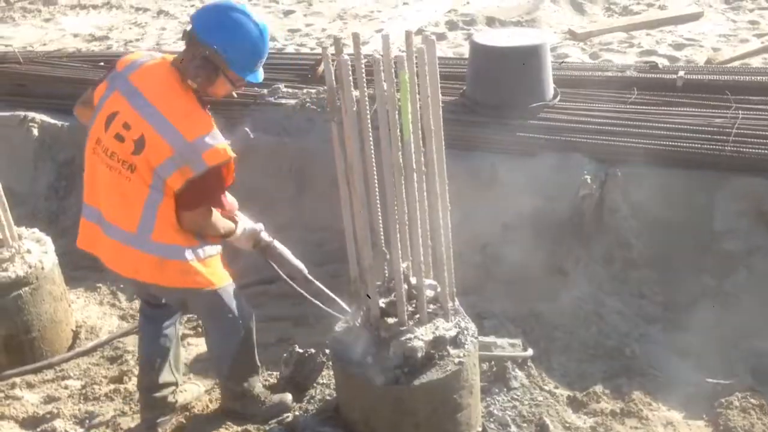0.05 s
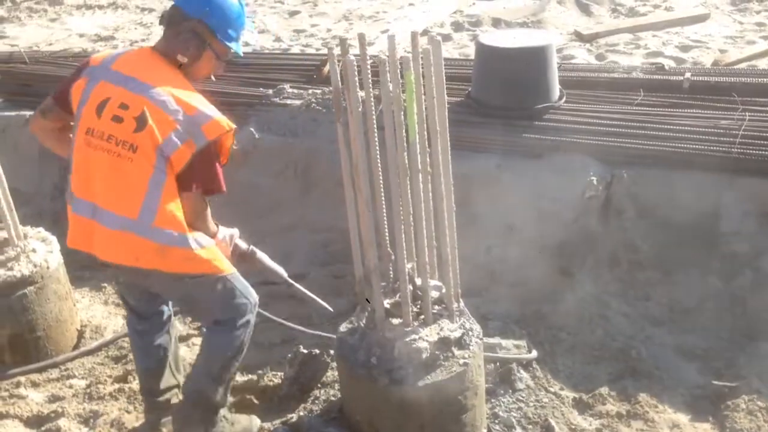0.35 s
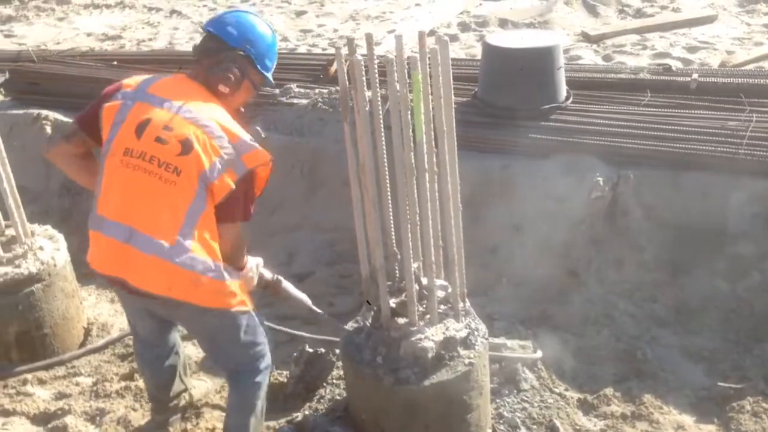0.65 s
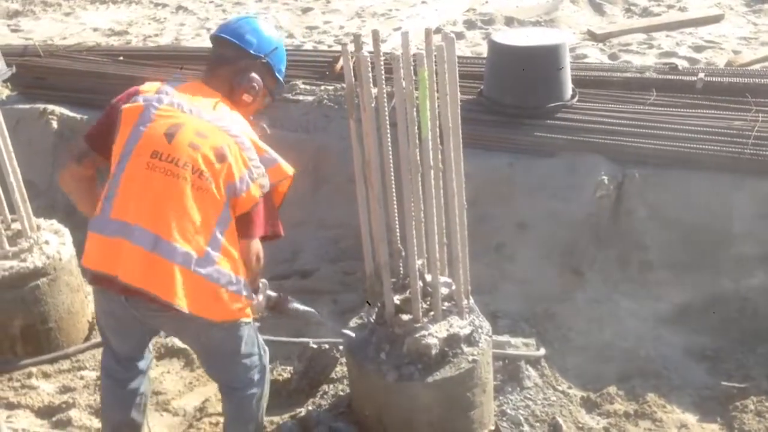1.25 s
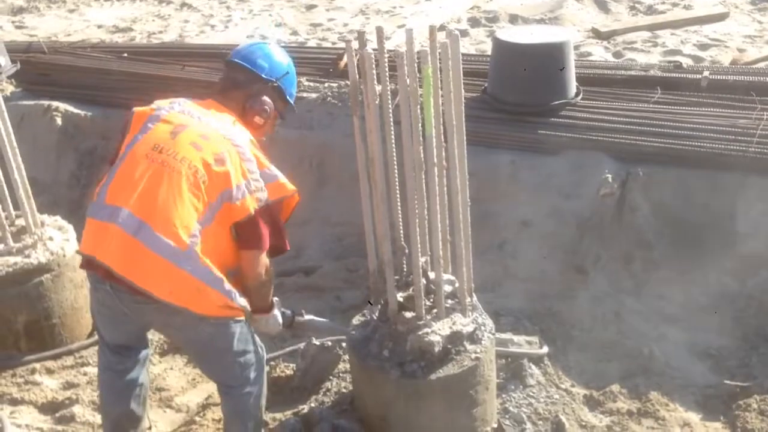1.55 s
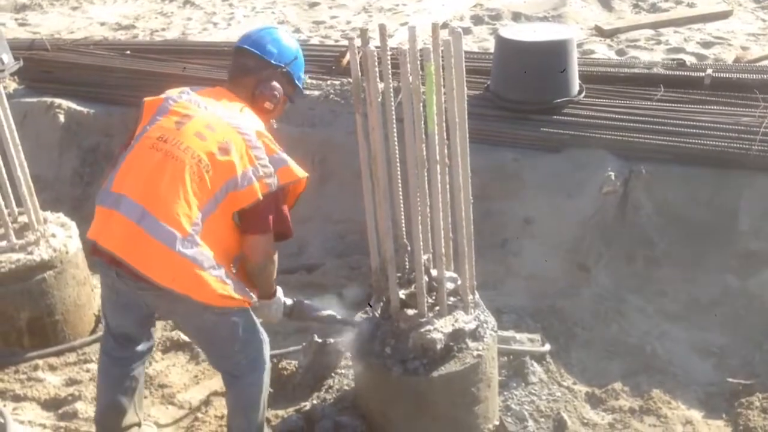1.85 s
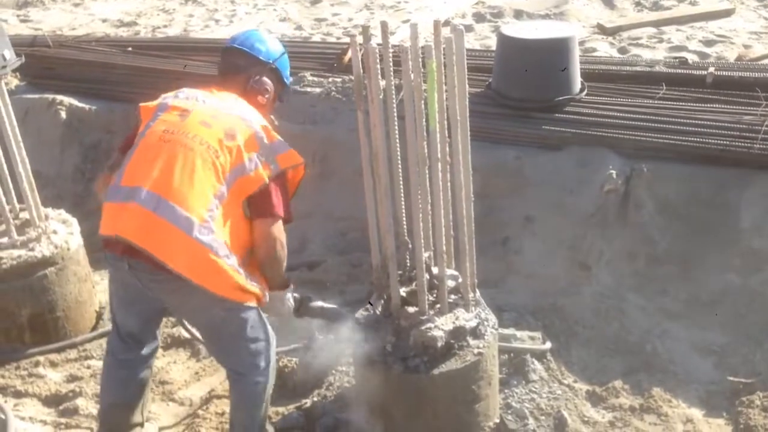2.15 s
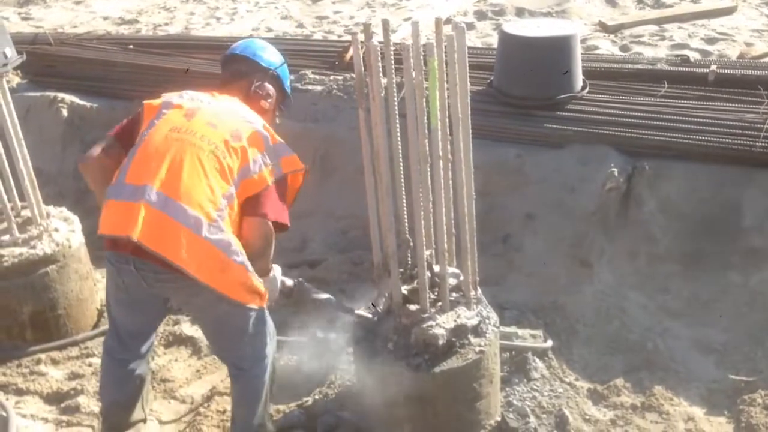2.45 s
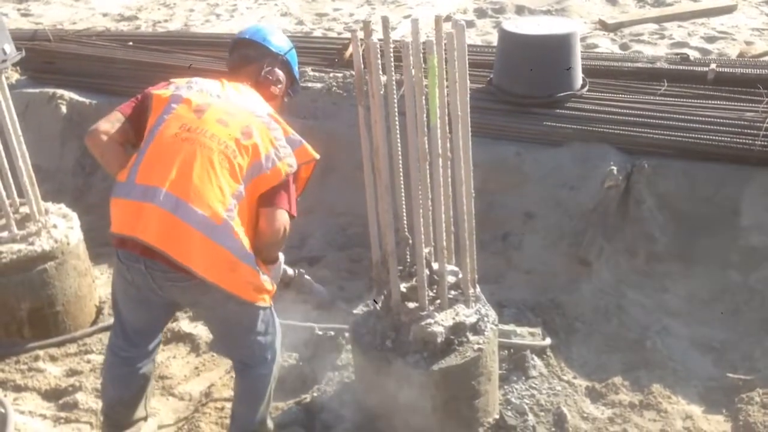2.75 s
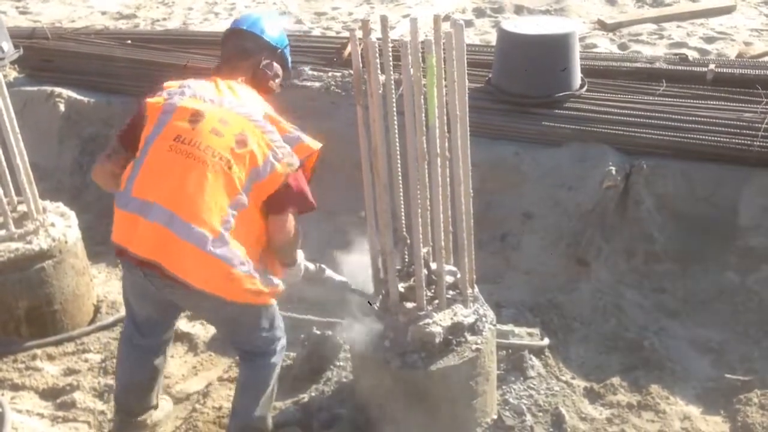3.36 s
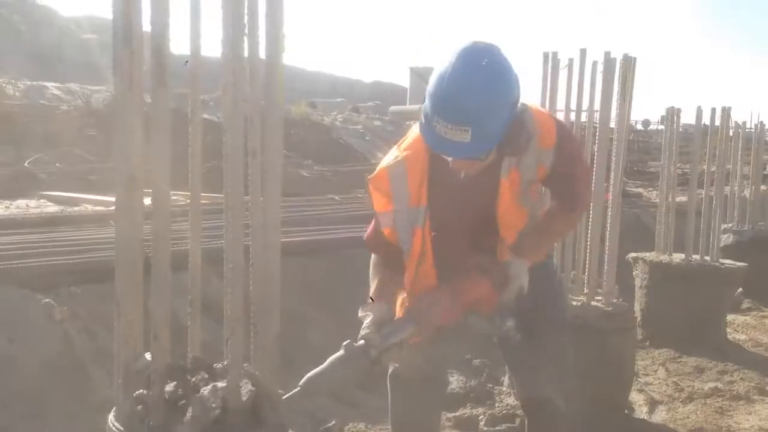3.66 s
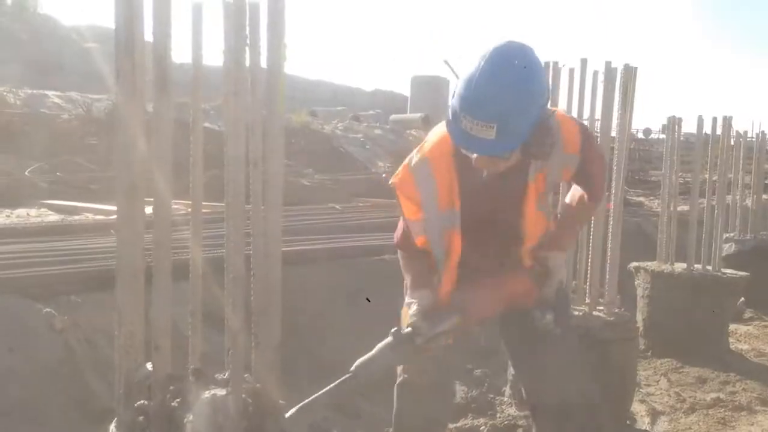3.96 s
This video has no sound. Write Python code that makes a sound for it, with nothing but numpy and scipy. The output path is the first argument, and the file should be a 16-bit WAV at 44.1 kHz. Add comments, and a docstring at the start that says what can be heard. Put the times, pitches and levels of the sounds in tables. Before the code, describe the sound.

A pneumatic hammer chips concrete close to the microphone in an earth pit. A few single blows lead to two rapid ringing bursts, with chisel clanks between, then a sharp air blast. Leaking air hisses and a distant compressor hums.

```python
"""Close to a pneumatic demolition hammer on a concrete pile, in an earth pit; air leaks, a far compressor hums.
One blow opens, two follow at 1 s: each thumps, cracks and rings the casing and the steel chisel.
Bursts of about 13 blows a second come at 1.8 s and 3.2 s, the return strokes puffing air; in the gaps
the tool clanks and knocks. At 3.8 s the chisel slips off and the piston fires empty, sending a gust to
the microphone. The recorder's gain control ducks on loud blows and creeps back."""
import sys
import numpy as np
from scipy import signal
from scipy.fft import rfft, irfft
from scipy.io import wavfile
from scipy.ndimage import uniform_filter1d

SR = 44100
rng = np.random.default_rng(int(sys.argv[2]) if len(sys.argv) > 2 else 0)


def to_wav(sig):
    """Store sig (one row per channel, or 1-D mono) as 16-bit WAV at the path in sys.argv[1].

    Samples outside -1..1 are clipped; the rate is SR.
    """
    pcm = np.clip(np.atleast_2d(sig), -1, 1) * 32767
    pcm = np.round(pcm).astype(np.int16)
    wavfile.write(sys.argv[1], SR, pcm.T)  # frames by channels


N = 176400
T = np.arange(N) / SR

# piston blows: start_s, level_db, hold_s, crack_t60_s, lower_ring_db, upper_ring_db, ring_t60_s
BLOWS = [(.0045, 3.5, 0.0028, 0.042, -7, -18, 0.086), (1.005, -10, 0.0079, 0.05, -35, -26, 0.025),
         (1.0406, 0.5, 0.0014, 0.044, 0, -19, 0.18), (1.8154, -10, 0.0037, 0.054, -26, -20, .044),
         (1.8531, 0, 0.0019, 0.055, -3, -3, 0.1), (1.926, -2.5, 0.0046, 0.074, -13, 5.5, .13),
         (2.003, 2, 0.0019, .075, 12, 2, 0.033), (2.086, 3.5, 0.0016, 0.055, 6.5, 3, .11),
         (2.1663, 3.5, 0.0026, 0.044, 3, 0.5, 0.083), (2.2423, 1, 0.0025, .049, 4, 0, 0.038),
         (2.3158, 2.5, 0.0037, .046, -1.5, -1.5, 0.063), (2.3934, 3.5, 0.0058, 0.033, -19, -10.5, 0.13),
         (2.4773, 2, 0.0069, 0.044, -13, -15, 0.088), (3.2283, 1.5, 0.002, 0.061, 2.5, 4, .11),
         (3.3065, -0.5, 0.0013, 0.057, -.5, -26, 0.18), (3.3877, -3.5, 0.0028, 0.077, -3, -7, 0.12),
         (3.4855, -3, 0.0028, 0.054, -2.5, -10, 0.075), (3.7526, -2, 0.0023, .04, -21, -30.5, 0.091)]
# return strokes of the piston: start_s, level_db
RETURN_STROKES = [(1.094, -16.5), (1.892, -18), (1.965, -11.5), (2.048, -12), (2.13, -13.5), (2.206, -16),
                  (2.279, -17), (2.355, -16), (2.439, -14.5), (3.152, -19.5), (3.191, -19), (3.273, -16),
                  (3.353, -17.5), (3.451, -18.5), (3.54, -19.5), (3.842, -9)]
# chisel clanking on concrete and bars, chips ticking: start_s, level_db, centre_hz, width_octaves, t60_s
CLANKS = [(0.9589, -9, 4650, 0.49, 0.035), (.962, -21.5, 2300, 0.49, 0.26), (.978, -25, 886, 0.077, 0.27),
          (1.124, -15, 4480, 1, 0.045), (1.149, -19.5, 5160, 0.87, .05), (1.1772, -8, 4830, 0.24, 0.065),
          (1.442, -19, 4300, 0.62, 0.04), (1.561, -11.5, 2030, 0.13, 0.043),
          (1.569, -12.5, 5230, 0.33, 0.064), (1.781, -25.5, 1560, 0.82, 0.4),
          (2.952, -33, 3000, 0.82, 0.028), (3.0044, -27.5, 3800, 0.46, 0.051),
          (3.1425, -18, 1940, 0.18, 0.093), (3.193, -17.5, 1230, 0.69, 0.11),
          (3.578, -26, 2000, 0.3, 0.089), (3.6062, -1.5, 4350, 0.1, 0.032), (3.688, -16, 7000, 1, 0.053),
          (3.706, -16.5, 3700, 0.34, 0.042), (3.7246, -7.5, 1980, 0.43, 0.14),
          (3.732, -11, 4100, 0.64, 0.064)]
# loose chisel rattling in its holder: start_s, bending_db, high_ring_db
RATTLES = [(0.077, -25, -54), (0.87, -33.5, -25), (1.048, -18.5, -24), (1.081, -42.5, -10),
           (1.131, -16.5, -9), (1.569, -23, -20), (1.89, -41, 1), (1.908, -38, -3), (1.962, -26, -12),
           (2.0225, -34, 0.5), (2.568, -25, -43), (3.42, -25, 0.5), (3.433, -28, -30), (3.582, -30.5, -47),
           (3.844, -29, 3.5)]
# dull boom under the blows at 0 s and 1.04 s, softer knocks of the tool elsewhere: start_s, level_db
KNOCKS = [(.002, -4), (.136, -22), (1.041, -9), (1.156, -17), (1.781, -25), (2.611, -22), (3.154, -18),
          (3.217, -20), (3.591, -20), (3.734, -21), (3.772, -21), (3.842, -18)]

# modes of the struck pile, recoiling tool, casing, bending chisel and whole tool fired empty:
# pitch_hz, level_db, t60_s
PILE_MODES = [(358, -1, .033), (405, 0, .033), (495, -4, .045)]
RECOIL_MODES = [(158, -1, .06), (205, 0, .05), (255, -2, .045)]
CASING_MODES = [(869, -0.5, 0.023), (2046, 1, 0.017), (2340, -52, 0.053), (2815, -7, 0.057),
                (3120, -15, 0.028), (4050, -13, 0.1), (4766, 5.5, 0.023), (5494, 4, 0.027),
                (6080, -6.5, 0.032), (6100, 6, 0.018), (10150, 0.5, 0.049), (13615, -5, .06),
                (14200, -2, .08)]
BENDING_MODES = [(1210, -11, .13), (3110, -5, .085), (5625, 2, .11), (5720, -6, .07), (8700, -2, .1)]
BLANK_MODES = [(842, -8, .06), (1502, -7, .06), (1548, -8, .06), (1975, -5, .06), (2363, -9, .06),
               (2705, -4, .07), (3133, 1, .06), (4160, -9, .1), (4756, -5, .09), (5633, -13, .18),
               (7184, -13, .2), (8272, -6, .17), (8515, -9, .17), (8860, -3, .13), (12085, -19, .17),
               (13614, -2, .1), (15582, -12, .17)]
# two clusters of high chisel modes: pitch_hz, level_db
CHISEL_LOWER_MODES = [(8272, -11), (8325, -17), (8530, -10)]
CHISEL_UPPER_MODES = [(8720, -16.5), (8875, -40.5), (9204, -4.5)]

# noise of cracking concrete, a blow's thump, the empty blast, a dull knock and the leaking line:
# frequency_hz, density_db
CRACK_SPECTRUM = [(60, -49), (200, -6), (600, -3), (820, -1.5), (1050, -0.5), (1400, -5), (2000, 1),
                  (2500, -0.5), (3700, -0.5), (4200, 2), (5100, -3.5), (5800, 4), (6500, -5), (7200, -4.5),
                  (7900, -0.5), (8500, 3), (9500, -0.5), (10500, -7), (12600, -8.5), (13500, -8.5),
                  (16000, -2)]
THUMP_SPECTRUM = [(25, -32), (70, -38), (105, -14), (150, -1.5), (290, -4.5), (385, -4), (490, -5.5),
                  (600, -19), (820, -7), (1200, -27.5), (4000, -70)]
BLANK_SPECTRUM = [(60, -23), (150, -1.5), (400, 3.5), (1000, 3), (2000, 1.5), (4300, 2.5), (6000, -1),
                  (9000, -1), (12400, -17), (14000, -20), (16000, -24)]
KNOCK_SPECTRUM = [(60, -48), (150, -8.5), (250, -9.5), (305, -7.5), (400, -12.5), (700, -39), (3000, -64)]
LEAK_SPECTRUM = [(30, -32), (55, -14.5), (80, -49), (102, -19), (130, -1), (160, -2.5), (195, -2.5),
                 (300, -0.5), (360, -10), (440, -5.5), (520, -11), (800, -15), (1200, -8.5), (1500, -14.5),
                 (2000, -10.5), (2300, -24.5), (2900, -14), (3400, -20), (4800, -18.5), (5500, -12.5),
                 (6300, -12.5), (6800, -13), (7250, -10), (7600, -10.5), (8100, -12.5), (8800, -11.5),
                 (9600, -12.5), (10200, -8.5), (10700, -13), (11050, -13), (11400, -14.5), (12100, -26),
                 (12700, -25), (13350, -11), (15800, -14)]
# whistles of the leak: pitch_hz, width_hz, level_db
LEAK_WHISTLES = [(955, 8.9, -51.5), (3590, 210, -51), (4110, 62, -50.5), (6700, 41, -47), (7540, 100, -44)]
# tones of the distant compressor: pitch_hz, level_db
COMPRESSOR_TONES = [(104, -44), (158, -45)]

CRACK_ATTACK_S, THUMP_ATTACK_S, RECOIL_ATTACK_S = .0022, .0035, .008
RING_ATTACK_S, CLANK_ATTACK_S = .0094, .0017
EVENT_SAMPLES = 16384


def hammer_blows():
    """The piston drives the chisel into the concrete: a thump, a crack, ringing casing and steel."""
    crack_lag_s, ring_lag_s, casing_db = .001, .00086, -11
    out = np.zeros(N)
    for start_s, level_db, hold_s, crack_t60_s, lower_db, upper_db, ring_t60_s in BLOWS:
        add(out, start_s, undb(level_db) * thump())
        crack = grit() * envelope(CRACK_ATTACK_S, hold_s, crack_t60_s)
        casing = undb(casing_db) * ring(CASING_MODES, CRACK_ATTACK_S, hold_s)
        add(out, start_s + crack_lag_s, undb(level_db) * (crack + casing))
        lower = undb(lower_db) * chisel_ring(CHISEL_LOWER_MODES, ring_t60_s)
        upper = undb(upper_db) * chisel_ring(CHISEL_UPPER_MODES, ring_t60_s)
        add(out, start_s + ring_lag_s, lower + upper)
    return out


def thump():
    """The struck pile knocks first; the boom of the recoiling tool swells just after."""
    pile = undb(-6.5) * pushed_modes(PILE_MODES, THUMP_ATTACK_S)
    recoil = undb(-14.5) * pushed_modes(RECOIL_MODES, RECOIL_ATTACK_S)
    thud = undb(-15) * noise(colour(THUMP_SPECTRUM)) * envelope(THUMP_ATTACK_S, hold_s=.004, t60_s=.06)
    return pile + recoil + thud


def grit():
    """Grainy broadband noise of crushed concrete and escaping air."""
    return unit(noise(colour(CRACK_SPECTRUM)) * undb(3 * wander(rate_hz=940)))


def chisel_ring(modes, t60_s):
    """High ring of the steel; each mode wavers as the tip grinds, and the contact sets its length."""
    out = 0
    for pitch_hz, level_db in modes:
        waver_db = 4.5 * (wander(rate_hz=70) - .5)
        out += undb(level_db + waver_db) * ring([(pitch_hz, 0, t60_s)], RING_ATTACK_S)
    return out


def return_strokes():
    """The piston comes back with a chattering puff of air, softly ringing the casing and the pile."""
    out = np.zeros(N)
    for start_s, level_db in RETURN_STROKES:
        chatter = unit(grit() * undb(4 * wander(rate_hz=300)))
        low_air = undb(-3) * noise(colour(THUMP_SPECTRUM))
        puff = (chatter + low_air) * envelope(attack_s=.0014, hold_s=.0062, t60_s=.087)
        casing = undb(-2) * ring(CASING_MODES, RING_ATTACK_S)
        pile = undb(-14) * pushed_modes(PILE_MODES, RECOIL_ATTACK_S)
        add(out, start_s, undb(level_db) * (puff + casing + pile))
    return out


def blank_blow():
    """An empty stroke: air blasts out, a gust reaches the microphone and the undamped steel rings."""
    start_s, gust_hz = 3.792, 45
    gust = undb(-20) * noise(lambda f: 1 / (1 + (f / gust_hz) ** 2))
    blast = undb(3.5) * noise(colour(BLANK_SPECTRUM))
    air = (blast + gust) * envelope(CRACK_ATTACK_S, hold_s=.033, t60_s=.066)
    kick = undb(1.5) * thump()
    steel = undb(-.5) * ring(BLANK_MODES, attack_s=.025, hold_s=.024, scatter_db=-2)
    out = np.zeros(N)
    add(out, start_s, air + kick + steel)
    return out


def chisel_clatter():
    """The chisel clanks against concrete and bars and rattles loose in its holder."""
    rattle_t60_s = .1
    out = np.zeros(N)
    for start_s, level_db, centre_hz, width_octaves, t60_s in CLANKS:
        def band(f):
            """A resonant peak on a broadband floor that rises with its width."""
            peak = np.exp(-.5 * (np.log2(f / centre_hz) / width_octaves) ** 2)
            return colour(CRACK_SPECTRUM)(f) * (peak + width_octaves)
        clank = noise(band) * envelope(CLANK_ATTACK_S, hold_s=.00036, t60_s=t60_s)
        add(out, start_s, undb(level_db) * clank)
    for start_s, bending_db, high_ring_db in RATTLES:
        clink = ring(BENDING_MODES, RING_ATTACK_S) * undb(6 * wander(rate_hz=195))
        scrape = undb(-2) * grit() * envelope(CLANK_ATTACK_S, 0, rattle_t60_s)
        high_ring = undb(high_ring_db) * chisel_ring(CHISEL_LOWER_MODES, rattle_t60_s)
        add(out, start_s, undb(bending_db) * (clink + scrape) + high_ring)
    return out


def low_knocks():
    """Dull low knocks: the boom under the blows at 0 s and 1.04 s, softer knocks of the tool elsewhere."""
    out = np.zeros(N)
    for start_s, level_db in KNOCKS:
        knock = noise(colour(KNOCK_SPECTRUM)) * envelope(attack_s=.0073, hold_s=0, t60_s=.079)
        add(out, start_s, undb(level_db) * knock)
    return out


def radiate(x, bass_cut_hz=55):
    """The tool and the pile send little deep bass to the microphone."""
    return signal.sosfilt(signal.butter(3, bass_cut_hz, "high", fs=SR, output="sos"), x)


def pit_echo(x):
    """Short echo off the earth walls of the pit."""
    tail = noise(colour([(100, -3), (400, -3), (1200, -2), (14000, -1.5)]))
    tail *= envelope(attack_s=.0038, hold_s=0, t60_s=.14)
    tail /= np.sqrt(np.sum(tail ** 2))
    return undb(-16) * signal.fftconvolve(x, tail)[:N]


def air_leak():
    """Air escapes from the line in a steady hiss with faint whistles."""
    hiss_db = -32.5 - .1 * wander(rate_hz=30, size=N)
    out = undb(hiss_db) * noise(colour(LEAK_SPECTRUM), N)
    for pitch_hz, width_hz, level_db in LEAK_WHISTLES:
        out += undb(level_db) * noise(lambda f: 1 / (1 + (2 * (f - pitch_hz) / width_hz) ** 2), N)
    return out


def compressor():
    """The compressor hums in the distance; its tones drift together in pitch and waver in level."""
    speed = 1 + .0098 * wander(rate_hz=4.95, size=N)
    running_s = np.cumsum(speed) / SR
    out = np.zeros(N)
    for pitch_hz, level_db in COMPRESSOR_TONES:
        waver_db = 2 * wander(rate_hz=12, size=N)
        out += undb(level_db + waver_db) * np.sin(2 * np.pi * pitch_hz * running_s)
    return out


def ring(modes, attack_s, hold_s=0, scatter_db=3.5):
    """Decaying modes, excited with a different strength and phase each time."""
    out = 0
    for pitch_hz, level_db, t60_s in modes:
        gain = undb(level_db + scatter_db * rng.standard_normal())
        tone = np.sin(2 * np.pi * (pitch_hz * T[:EVENT_SAMPLES] + rng.random()))
        out += gain * envelope(attack_s, hold_s, t60_s) * tone
    nominal_power = sum(undb(level_db) ** 2 for _, level_db, _ in modes) / 2
    return out / np.sqrt(nominal_power)


def pushed_modes(modes, attack_s, detune=.015):
    """Low modes set going together by one push, so that every blow sounds nearly alike."""
    t = T[:EVENT_SAMPLES] * (1 + detune * rng.standard_normal())
    return sum(undb(level_db) * envelope(attack_s, 0, t60_s) * np.sin(2 * np.pi * pitch_hz * t)
               for pitch_hz, level_db, t60_s in modes)


def envelope(attack_s, hold_s, t60_s):
    """Linear rise, hold, exponential fall."""
    t = T[:EVENT_SAMPLES]
    falling_s = np.maximum(t - attack_s - hold_s, 0)
    return np.minimum(t / attack_s, 1) * undb(-60 * falling_s / t60_s)


def noise(shape, size=EVENT_SAMPLES):
    """Noise of rms 1, coloured by the gain function shape(frequency_hz)."""
    f = np.maximum(np.arange(size // 2 + 1) * SR / size, 1)
    return unit(irfft(rfft(rng.standard_normal(size)) * shape(f), size))


def colour(points):
    """Gain function through (frequency_hz, level_db) points."""
    hz, db = np.array(points, float).T
    return lambda f: undb(np.interp(np.log(f), np.log(hz), db))


def wander(rate_hz, size=EVENT_SAMPLES):
    """Smooth random motion of rms 1, mostly slower than rate_hz."""
    return noise(lambda f: np.exp(-(f / rate_hz) ** 2), size)


def undb(db):
    """Decibels to amplitude."""
    return 10 ** (np.asarray(db) / 20)


def unit(x):
    """Scale to rms 1."""
    return x / np.sqrt(np.mean(x ** 2))


def add(out, start_s, x):
    """Mix x into out from start_s on."""
    i = max(int(start_s * SR), 0)
    out[i:i + len(x)] += x[:len(out) - i]


def scene():
    """One microphone in the pit: the tool up close, its echo, then the leak and compressor behind."""
    tool = radiate(hammer_blows() + return_strokes() + chisel_clatter() + low_knocks()) + blank_blow()
    return (tool + pit_echo(tool) + air_leak() + compressor())[None]


def record(dry):
    """Gain control drops at once on a loud blow and creeps back; peaks are rounded and the top is cut."""
    threshold_db, detect_s, recover_db_per_s = -6, .0053, 13
    ceiling, top_hz = 1.3, 15900
    power = uniform_filter1d(dry[0] ** 2, int(detect_s * SR))
    over_db = np.maximum(10 * np.log10(np.maximum(power, 1e-12)) - threshold_db, 0)
    recovery_db = recover_db_per_s * T
    duck_db = np.maximum.accumulate(over_db + recovery_db) - recovery_db
    ducked = dry * undb(-duck_db)
    rounded = ducked / (1 + (ducked / ceiling) ** 4) ** .25
    return signal.sosfilt(signal.ellip(10, .2, 70, top_hz, fs=SR, output="sos"), rounded)


dry = scene()
out = record(dry)
to_wav(out)
```